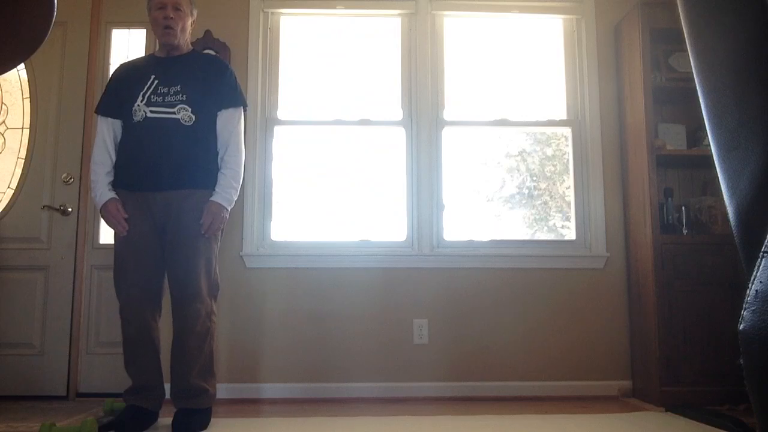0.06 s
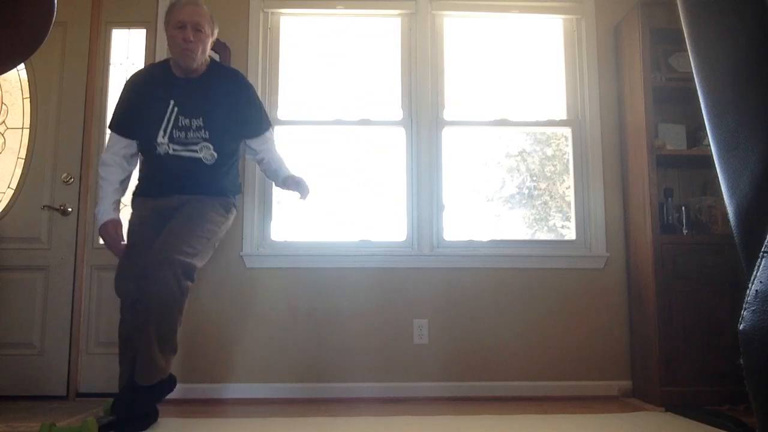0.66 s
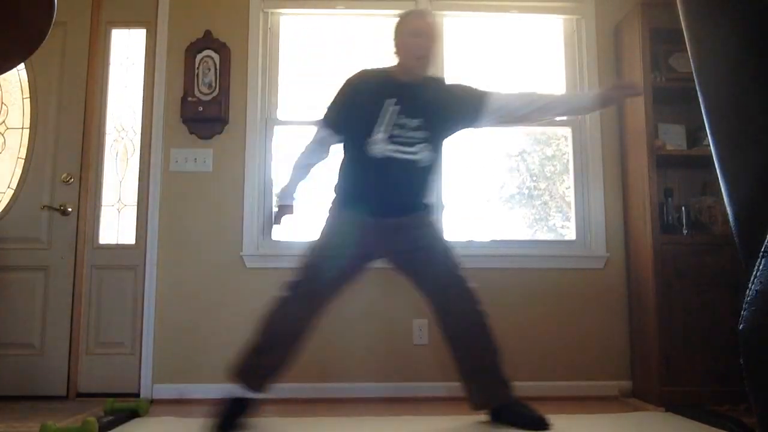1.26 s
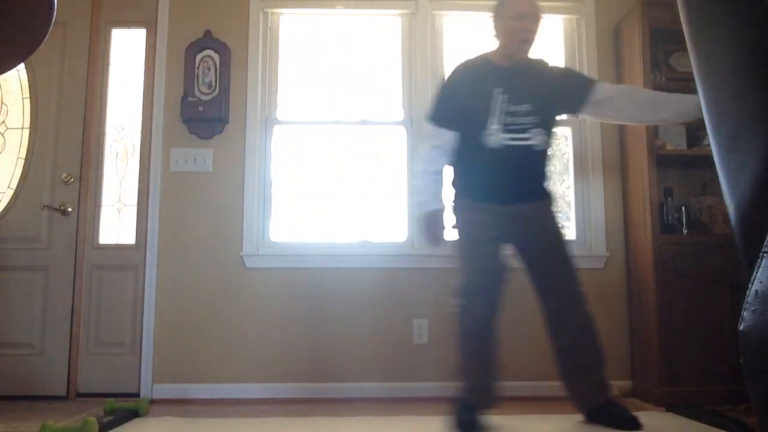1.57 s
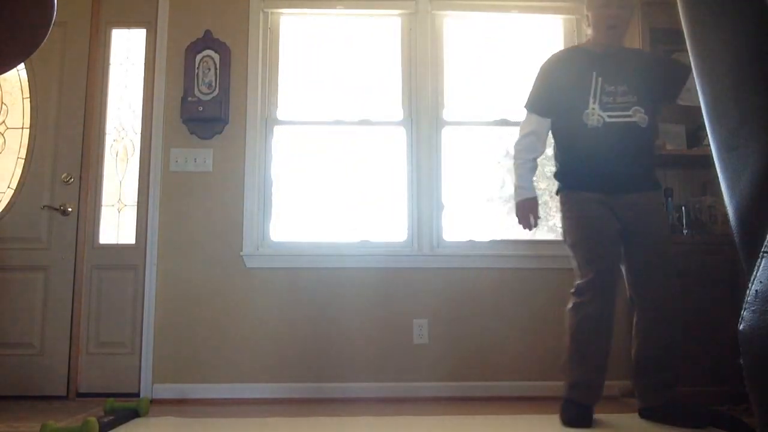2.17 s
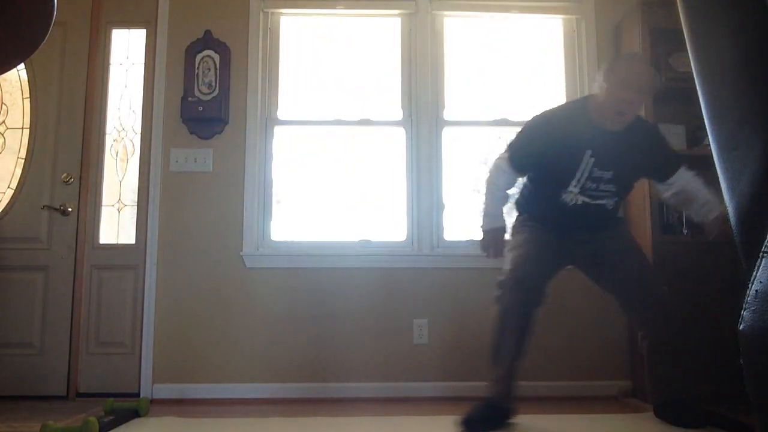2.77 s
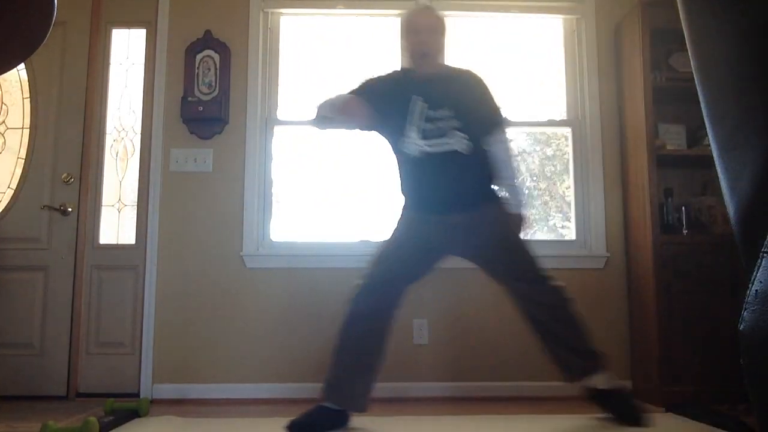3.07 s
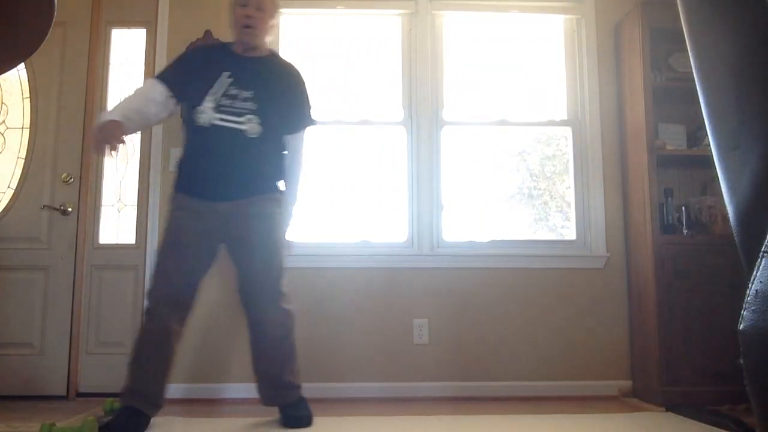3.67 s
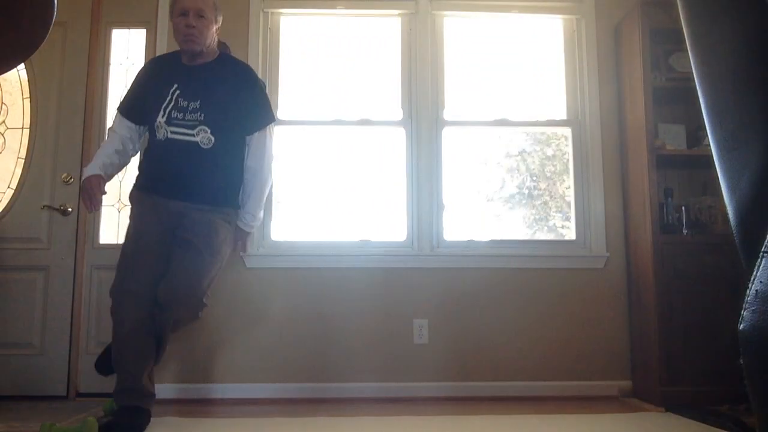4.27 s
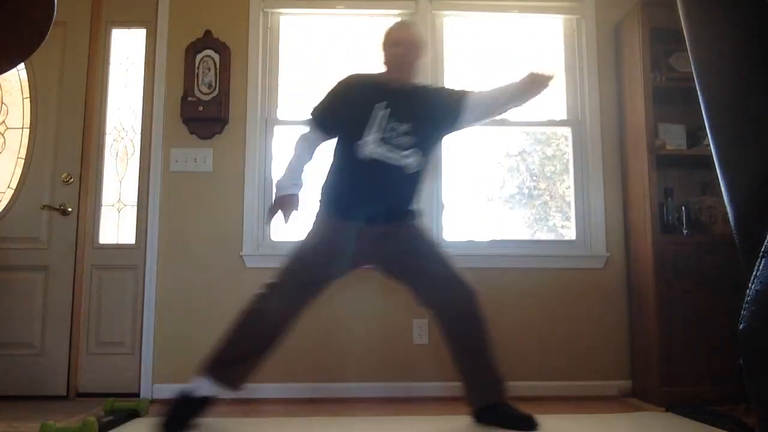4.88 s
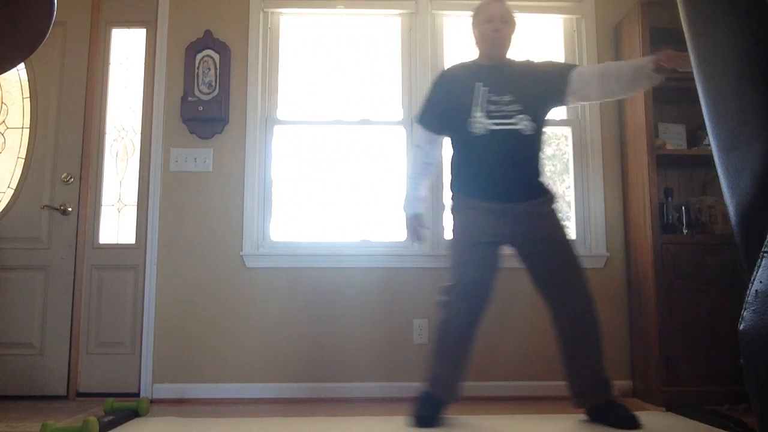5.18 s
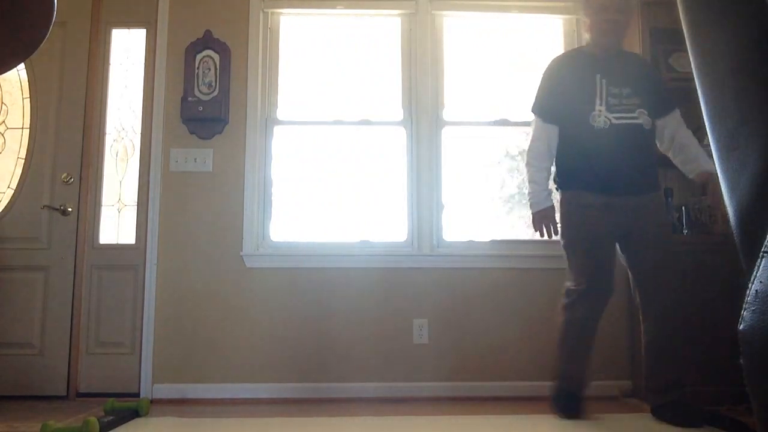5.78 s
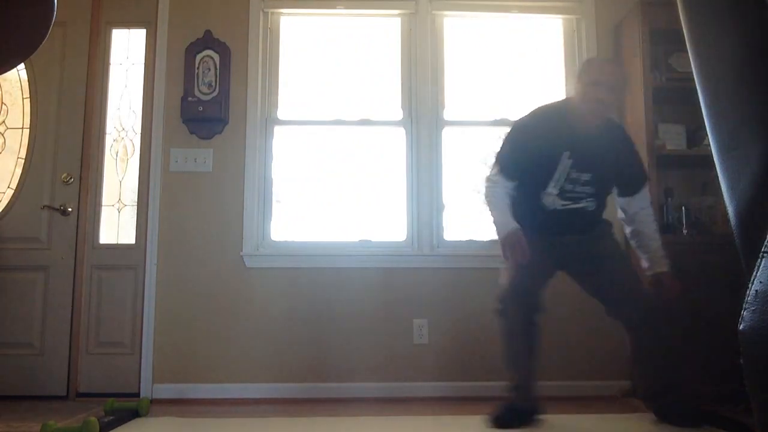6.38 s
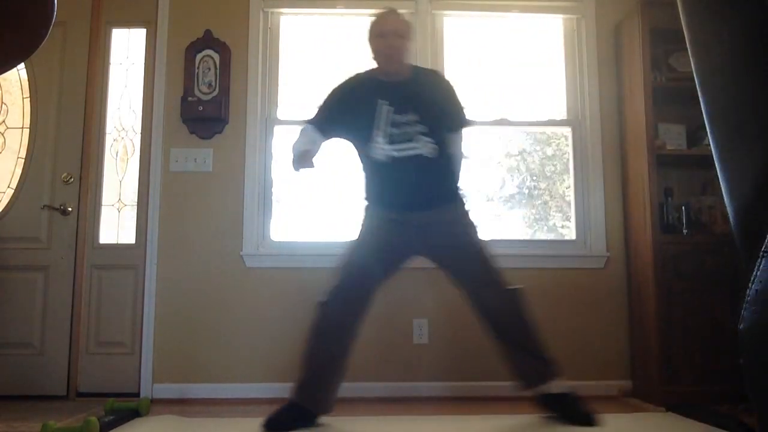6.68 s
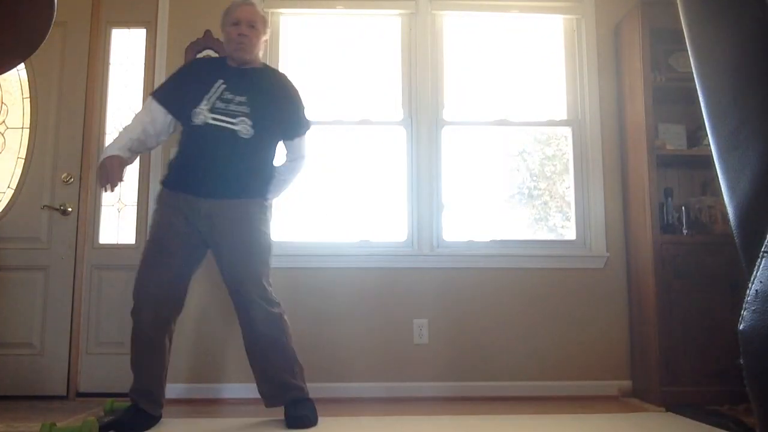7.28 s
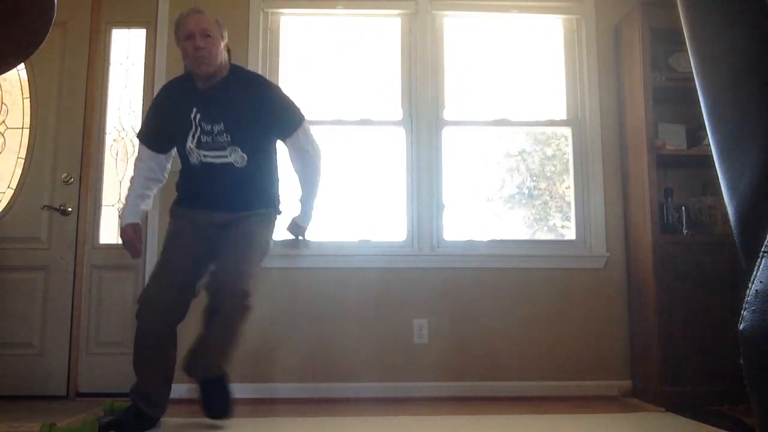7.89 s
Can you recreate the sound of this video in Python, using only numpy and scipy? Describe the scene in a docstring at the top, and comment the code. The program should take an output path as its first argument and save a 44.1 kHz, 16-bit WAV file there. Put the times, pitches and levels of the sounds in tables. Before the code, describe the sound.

Four long, hissing swishes of cloth on plastic come at an even pace as a person slides back and forth on an exercise board. Dull thumps on a wooden floor, brief brushes and faint squeaks fall around them. The end bumper clacks twice with a short rattle, the second time louder. The sound is mono, from a small microphone in a slightly reverberant room with a low ventilation hum.

```python
"""Slide board in a living room

Someone in cloth booties skates from side to side on a plastic slide board. Each glide hisses, brighter
while the feet are fast, and the trailing foot is drawn in with a short swish. Soles judder and squeak,
the far bumper knocks, the wooden floor thuds under the shifting weight, and ventilation murmurs."""
import sys
import numpy as np
from scipy import signal
from scipy.io import wavfile

SR = 44100
rng = np.random.default_rng(int(sys.argv[2]) if len(sys.argv) > 2 else 0)


def dump_mix(stems):
    """Bounce the given channels to the path in sys.argv[1] as a 16-bit WAV at rate SR."""
    frames = np.atleast_2d(stems).T  # one column per channel
    limited = np.clip(frames, -1, 1)  # hard clip at full scale
    pcm = np.round(limited * 32767).astype(np.int16)
    wavfile.write(sys.argv[1], SR, pcm)


N = 350154


def glides(treble_hz=(5000, 11000), body_hz=(1800, 4200), grain_db=0.5, patchy_db=0.8, sway_db=0.53):
    """Cloth fibres slip over plastic: speed lifts the treble, weight on the foot fills out the body."""
    # Trips across the board: start_s, touch_gain, run_up_s, load_s, lull_s, cruise_s, slowing_s,
    # speed_loss_db, level_db, bright_db, body_db
    crossings = [(1.063, 0.22, 0.083, .15, 0.27, 0.51, 0.5, 24, -40, 3, 0),
                 (2.885, 0.04, 0.12, 0.034, .281, 0.57, 0.29, 9.5, -41, 1, 1),
                 (4.749, 0, .03, 0.083, 0.24, .69, 0.24, 33.5, -42, 1.5, 0),
                 (6.383, 0.24, 0.061, .28, 0.13, .388, .48, 3.5, -40.8, 0.7, 0)]
    # The other foot pushes off, brushes or is drawn in: middle_s, length_s, level_db, bright_db, body_db
    swishes = [(1.184, .103, -41, -2, -5), (2.239, .066, -50, 1.5, 3), (2.425, 0.073, -51, -3, 10),
               (3.107, .09, -43.6, -3, -12), (3.8, .24, -57.2, -2, 10.5), (3.979, 0.09, -48, -1.4, 1),
               (4.051, .11, -47, .4, -15), (4.721, .08, -63.5, -2, 5), (4.84, 0.11, -54, 1.5, 10),
               (4.913, .026, -46.5, 9, -1), (5.214, .22, -43, 1.5, -7), (6.594, 0.1, -49, 10.5, 4),
               (7.484, 0.065, -49.5, -3.5, -1.4)]
    # Tone of cloth on plastic: frequency_hz, density_db
    hiss_spectrum = [(300, -21.5), (550, -12.5), (750, -9.5), (1020, -12.5), (1370, -5.5), (2050, -5.5),
                     (2700, -0.5), (3500, 0), (6500, -.5), (8800, -3), (11600, -1), (15400, -5.5)]
    # The treble follows speed most: frequency_hz, hiss_db_per_speed_db
    speed_response = [(1500, 0), (4000, 0.47), (12000, 1.0)]
    t = np.arange(N) / SR
    control_t = t[::64]
    strokes = [crossing(control_t, *row) for row in crossings]
    strokes += [swish(control_t, *row) for row in swishes]
    steady, hiss = 0, 0
    for hz, noise in noise_bands(N):
        treble = np.interp(hz, treble_hz, [0, 1])
        body = np.interp(hz, body_hz, [1, 0])
        speed_slope = at_hz(speed_response, hz)
        power = sum((contact * from_db(speed_db * speed_slope + bright_db * treble + body_db * body)) ** 2
                    for contact, speed_db, bright_db, body_db in strokes)
        envelope = np.interp(t, control_t, np.sqrt(power))
        band = noise * from_db(at_hz(hiss_spectrum, hz))
        steady += band
        hiss += band * envelope * from_db(patchy_db * drift(rate_hz=40))
    flicker = from_db(grain_db * drift(rate_hz=350) + sway_db * drift(rate_hz=18))
    return room(flicker * hiss / np.std(steady), wet_db=-15.5)


def crossing(t, start_s, touch_gain, run_up_s, load_s, lull_s, cruise_s, slowing_s,
             speed_loss_db, level_db, bright_db, body_db):
    """The leading foot gets going, takes the weight, cruises, slows and digs in to stop."""
    coast_t60_s, stop_db_per_s = 0.62, 202
    lull_depth_db, lull_half_width_s = 4.6, 0.032  # speed sags as the push-off ends
    unloaded_db = -8.5  # thinner body before the weight arrives
    age = t - start_s
    stopping_s = np.maximum(age - cruise_s - slowing_s, 0)
    attack = np.interp(age, [0, run_up_s], [touch_gain, 1], left=0)
    contact = attack * from_db(level_db - 60 * stopping_s / coast_t60_s)
    lull_db = lull_depth_db * np.exp(-((age - lull_s) / lull_half_width_s) ** 2)
    slowed = np.clip((age - cruise_s) / slowing_s, 0, 1)
    speed_db = -lull_db - speed_loss_db * slowed - stop_db_per_s * stopping_s
    weight = np.clip(age / load_s, 0, 1) ** 2
    return contact, speed_db, bright_db, body_db + unloaded_db * (1 - weight)


def swish(t, middle_s, length_s, level_db, bright_db, body_db, lift_db=3.0, slow_db=1.5):
    """The other foot touches down, speeds up, slows and lifts in one arc."""
    away = np.minimum((2 * (t - middle_s) / length_s) ** 2, 100)
    contact = from_db(level_db - lift_db * away)
    speed_db = -slow_db * away
    return contact, speed_db, bright_db, body_db


def bumper_knocks(rattle_db=-9.5, rattle_t60_s=0.13):
    """The foot hits the bumper, which rings and rattles briefly on the floor."""
    # Blows on the bumper: start_s, level_db, hardness_hz
    blows = [(2.371, -39.5, 1090), (2.4236, -26.5, 1520), (2.431, -29, 1590), (5.558, -30.5, 700),
             (5.5698, -19.5, 2160), (5.577, -30, 2200), (5.589, -41, 3730)]
    track = np.zeros(N)
    t = np.arange(SR // 3) / SR
    for start_s, level_db, hardness_hz in blows:
        noise = butter(rng.standard_normal(len(t)), [520, max(hardness_hz, 900)], "band")
        rattle = from_db(rattle_db) * rms_one(noise) * decay(t, rattle_t60_s)
        add(track, start_s, from_db(level_db) * (clack(t, hardness_hz) + rattle))
    return room(butter(track, 260, "high"), wet_db=-10.5)


def clack(t, hardness_hz, scatter_db=1.5):
    """One blow rings the plastic; a softer contact loses the upper modes."""
    # Bumper resonances: pitch_hz, level_db, t60_s
    bumper_modes = [(680, -22, .05), (766, -5.5, 0.073), (871, 2, 0.027), (1007, -17, 0.099),
                    (1107, -11.5, 0.052), (1205, -13, 0.034), (1590, -16, 0.025), (2820, -17, 0.027),
                    (4060, -15, .012)]
    ringing = sum(from_db(db + scatter_db * rng.standard_normal()) * ring(t, hz, t60_s)
                  for hz, db, t60_s in bumper_modes)
    return butter(ringing, hardness_hz, "low", order=1)


def floor_thuds(settle_s=0.01247, settle_db=-7, settle_pitch_ratio=0.913):
    """The foot pushes on the floor and settles; the board slaps down with a short hollow note."""
    # Weight landing: start_s, level_db, pitch_hz, relative_slap_db
    landings = [(.556, -40, 208, -10.5), (1.17, -43.5, 161, -5.5), (1.219, -29.5, 254, -13),
                (1.706, -40, 184, -7.5), (2.424, -24.5, 225, -15), (2.468, -30.5, 185, -16),
                (3.008, -44.5, 174, -4.5), (3.085, -39.5, 208, -3), (3.403, -38, 265, -12.5),
                (3.752, -36, 256, -13.5), (4.153, -46, 261, -9), (4.478, -47, 180, -8.5),
                (4.675, -43.5, 237, -7), (4.771, -31, 250, -14.5), (4.8, -30, 209, -16.5),
                (4.899, -34, 316, -7.5), (4.938, -21, 252, -27), (5.009, -23, 241, -39),
                (5.062, -28, 210, -41), (5.306, -39.5, 177, -9.5), (5.573, -21, 227, -20),
                (5.614, -26, 200, -19), (6.388, -42, 200, -8), (6.551, -31.5, 103, -14),
                (6.569, -32.5, 194, -13.5), (6.62, -38.5, 210, -10), (6.958, -41.5, 186, -8.5),
                (7.268, -47, 200, -5.5)]
    pushes, slaps = np.zeros((2, N))
    t = np.arange(SR // 2) / SR
    hollow_note = from_db(1) * ring(t, hz=440, t60_s=0.093)
    for start_s, level_db, pitch_hz, slap_db in landings:
        add(pushes, start_s, from_db(level_db) * push(t, pitch_hz))
        settle = push(t, pitch_hz * settle_pitch_ratio)
        add(pushes, start_s + settle_s, from_db(level_db + settle_db) * settle)
        noise = butter(rng.standard_normal(len(t)), [280, 3000], "band")
        slap = rms_one(butter(noise, 800, "low", order=1)) * decay(t, t60_s=0.22)
        add(slaps, start_s, from_db(level_db + slap_db) * (slap + hollow_note))
    return room(floor_ring(pushes) + slaps, wet_db=-12.5)


def push(t, hz, rise_cycles=0.6):
    """A soft contact swells and dies within a few cycles."""
    age = t * hz / rise_cycles
    swell = age * np.exp(1 - age)
    return butter(swell * np.sin(2 * np.pi * hz * t), hz / 2, "high")


def floor_ring(force):
    """The sprung floor passes the force on and rings in its modes."""
    # Floor resonances: pitch_hz, gain_db, t60_s
    floor_modes = [(120, -17, .2), (151.7, 0.5, 0.2), (178.6, -3.5, 0.21), (218.9, 0, 0.15),
                   (296.5, 0, 0.17), (411, -2.5, 0.066)]
    t = np.arange(SR // 2) / SR
    response = np.zeros(len(t))
    for hz, gain_db, t60_s in floor_modes:
        build_up = t60_s * SR / (2 * np.log(1000))  # a mode's own gain at resonance
        response += from_db(gain_db) * ring(t, hz, t60_s) / build_up
    return force + signal.fftconvolve(force, response)[:N]


def scuffs(judder_db=3.0):
    """Uneven stick and slip feeds one resonance per scuff; some squeaks rise as the sole presses harder."""
    # Soles judder and squeak, cloth brushes, the board flexes:
    # start_s, length_s, level_db, pitch_hz, width_hz, rise_hz
    rubs = [(.04, 0.3, -75, 2980, 800, 0), (0.739, 0.12, -66, 1800, 1800, 0),
            (1.11, 0.16, -54, 110, 80, -1), (2.55, 0.093, -56, 1910, 1710, 0),
            (2.98, 0.22, -50.5, 210.5, 150, 2.5), (3.049, 0.19, -49, 758, 440, 1.5),
            (4.329, 0.19, -59.5, 1697, 2520, -1), (4.76, 0.16, -51.5, 803, 1000, 1),
            (4.74, 0.45, -51, 135, 44, 0.5), (5.759, .1, -66.5, 5600, 6000, 0),
            (6.225, 0.09, -61.5, 2300, 260, 300), (6.319, 0.051, -60.5, 2580, 2000, 0),
            (6.548, 0.24, -53.5, 259.4, 260, 0), (6.617, 0.18, -50, 720, 460, -4),
            (7.872, 0.065, -54, 1500, 704, 650)]
    track = np.zeros(N)
    slips = from_db(judder_db * drift(rate_hz=200)) * rng.standard_normal((2, N))
    for start_s, length_s, level_db, pitch_hz, width_hz, rise_hz in rubs:
        start, size = int(start_s * SR), int(length_s * SR)
        inphase, quadrature = butter(slips[:, start:start + size], width_hz / 2, "low")
        phase = 2 * np.pi * np.cumsum(pitch_hz + np.linspace(0, rise_hz, len(inphase))) / SR
        resonance = inphase * np.cos(phase) + quadrature * np.sin(phase)
        pressure = np.sin(np.linspace(0, np.pi, len(phase)))
        add(track, start_s, from_db(level_db) * rms_one(pressure * resonance))
    return room(track, wet_db=-11.5)


def ventilation(air_db=-55):
    """A steady bed of moving air with two humming duct resonances."""
    # Tone of the airflow: frequency_hz, relative_density_db
    air_spectrum = [(24, -70), (40, -41), (170, -2.5), (223, -2), (253, -10), (349, 2.5), (448, -21),
                    (483, -11.5), (775, -12.5), (1150, -15), (1850, -17.5), (2050, -22.5), (3120, -23.5),
                    (4430, -28), (15400, -31.5)]
    # Duct resonances: pitch_hz, width_hz, level_db
    duct_modes = [(357.5, 18, -62.5), (484, 22.4, -66.5)]
    air = rms_one(sum(noise * from_db(at_hz(air_spectrum, hz)) for hz, noise in noise_bands(N)))
    hum = np.zeros(N)
    for hz, width_hz, level_db in duct_modes:
        band = butter(rng.standard_normal(N), [hz - width_hz / 2, hz + width_hz / 2], "band")
        hum += from_db(level_db) * rms_one(band)
    return from_db(air_db) * air + hum


def room(x, wet_db, fade_in_s=0.0074):
    """Direct sound plus a diffuse tail whose treble dies first."""
    # Living room reverb: frequency_hz, t60_s
    decay_times = [(100, 0.38), (300, 0.44), (1000, 0.43), (3000, 0.38), (12000, 0.11)]
    t = np.arange(SR // 2) / SR
    tail = sum(noise * decay(t, at_hz(decay_times, hz)) for hz, noise in noise_bands(len(t)))
    tail *= np.minimum(t / fade_in_s, 1) ** 2
    return x + from_db(wet_db) * signal.fftconvolve(x, tail / np.linalg.norm(tail))[:len(x)]


def from_db(db):
    return 10 ** (np.asarray(db) / 20)


def rms_one(x):
    return x / np.sqrt(np.mean(x ** 2) + 1e-20)


def at_hz(points, hz):
    """Reads a curve on a logarithmic frequency axis."""
    known_hz, values = np.transpose(points)
    return np.interp(np.log(hz), np.log(known_hz), values)


def drift(rate_hz):
    """A random wander with an RMS of 1."""
    knots = rng.standard_normal(int(N / SR * rate_hz) + 2)
    return rms_one(np.interp(np.arange(N) / SR * rate_hz, np.arange(len(knots)), knots))


def butter(x, hz, kind, order=2):
    sections = signal.butter(order, np.clip(hz, 10, 0.45 * SR), kind, fs=SR, output="sos")
    return signal.sosfilt(sections, x)


def noise_bands(size):
    """Yields centre_hz and noise for third-octave bands of equal density."""
    edges_hz = np.geomspace(35, 17900, 28)
    white = rng.standard_normal((2, size))
    for k, (low, high) in enumerate(zip(edges_hz, edges_hz[1:])):
        yield np.sqrt(low * high), butter(white[k % 2], [low, high], "band")


def decay(t, t60_s):
    return from_db(-60 * t / t60_s)


def ring(t, hz, t60_s):
    """One struck mode dying away."""
    return np.sin(2 * np.pi * hz * t) * decay(t, t60_s)


def add(track, start_s, sound):
    start = int(start_s * SR)
    track[start:start + len(sound)] += sound[:N - start]


def scene():
    """One microphone feeds both channels."""
    mix = glides() + bumper_knocks() + floor_thuds() + scuffs() + ventilation()
    return np.tile(mix, (2, 1))


def record(dry, low_cut_hz=83, high_cut_hz=15500):
    """The small microphone loses the deep bass, and the top is cut steeply."""
    thin = butter(dry, low_cut_hz, "high")
    return signal.sosfilt(signal.ellip(12, 0.1, 70, high_cut_hz, fs=SR, output="sos"), thin)


dry = scene()
out = record(dry)
dump_mix(out)
```